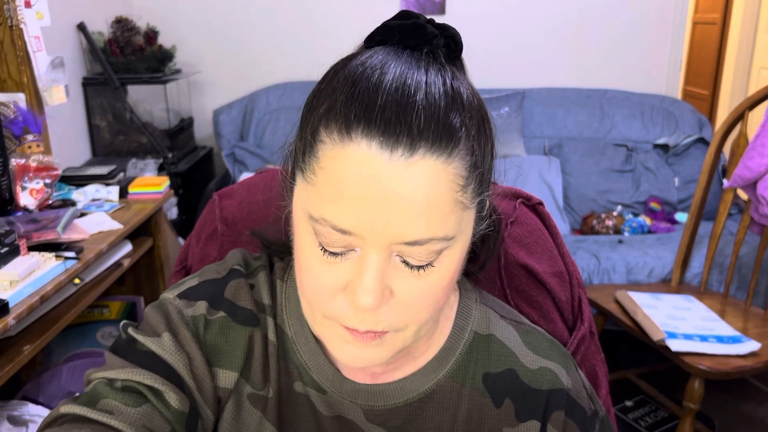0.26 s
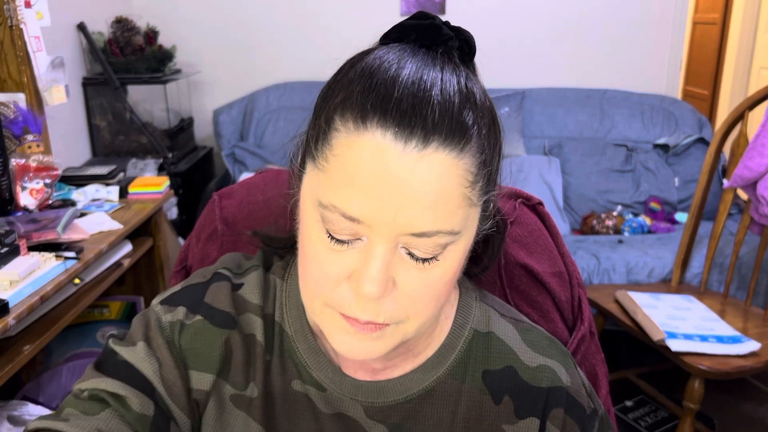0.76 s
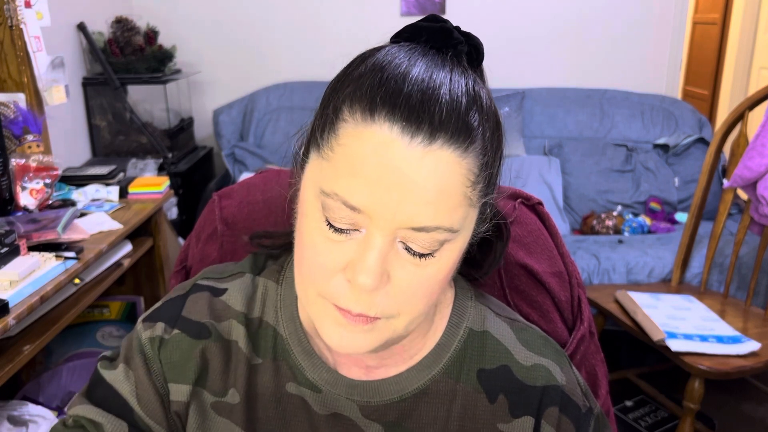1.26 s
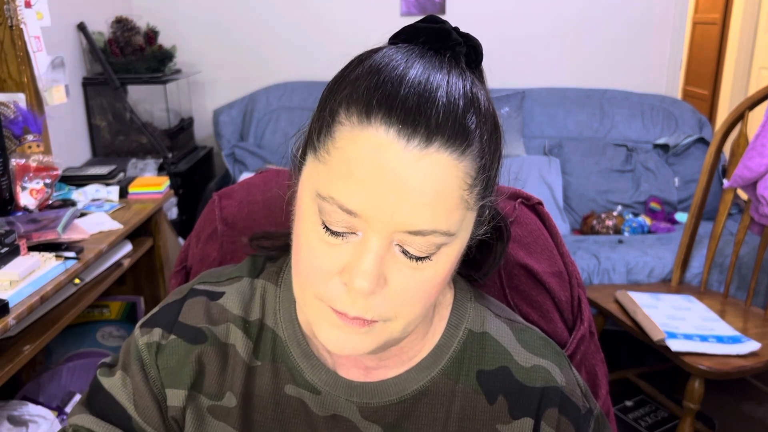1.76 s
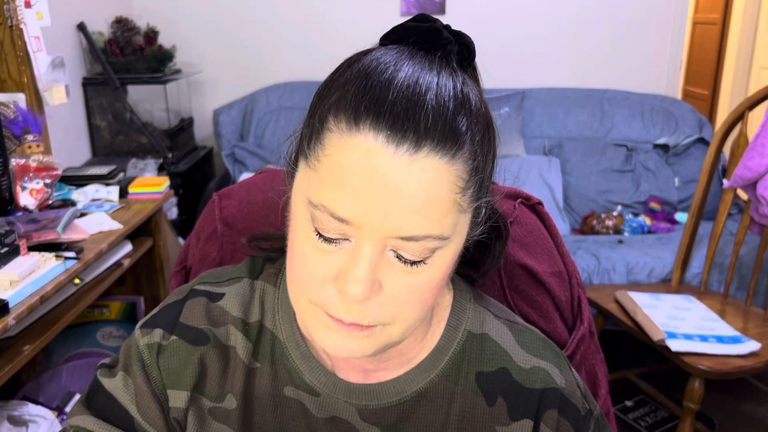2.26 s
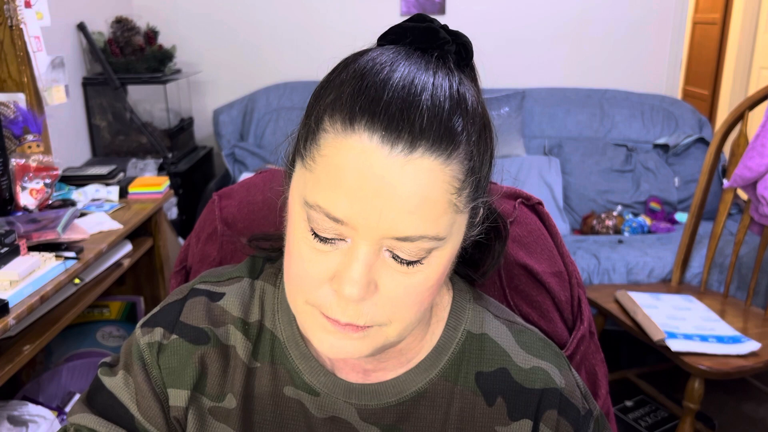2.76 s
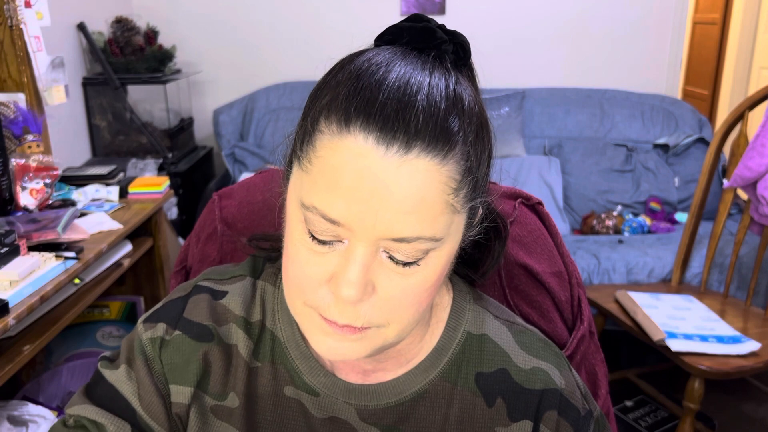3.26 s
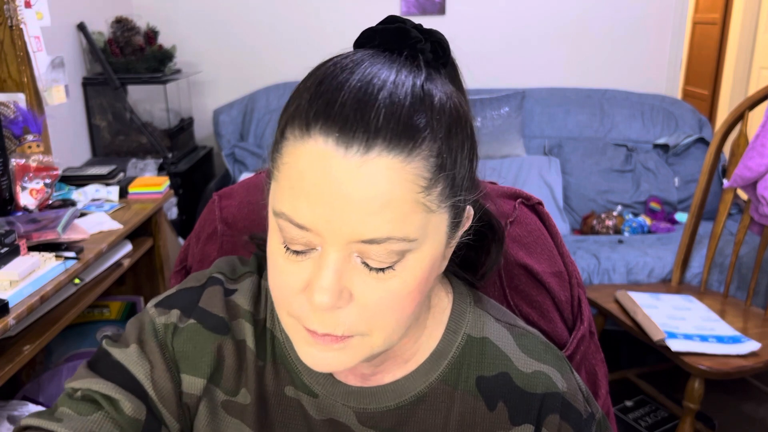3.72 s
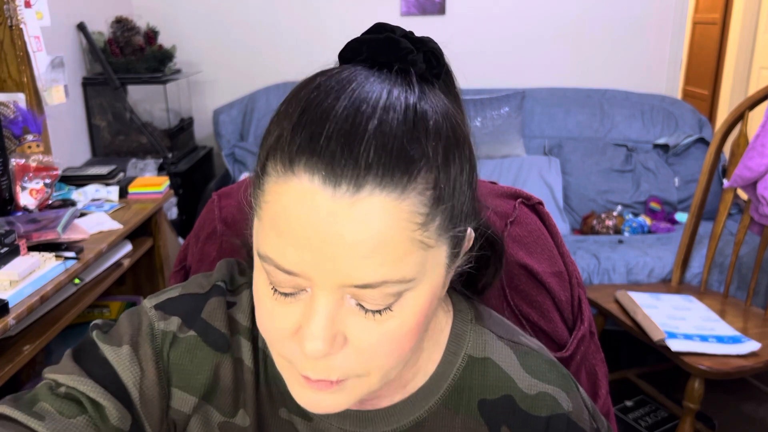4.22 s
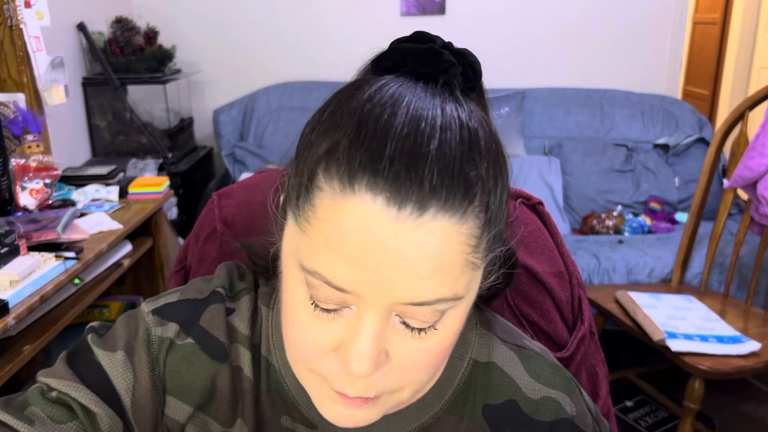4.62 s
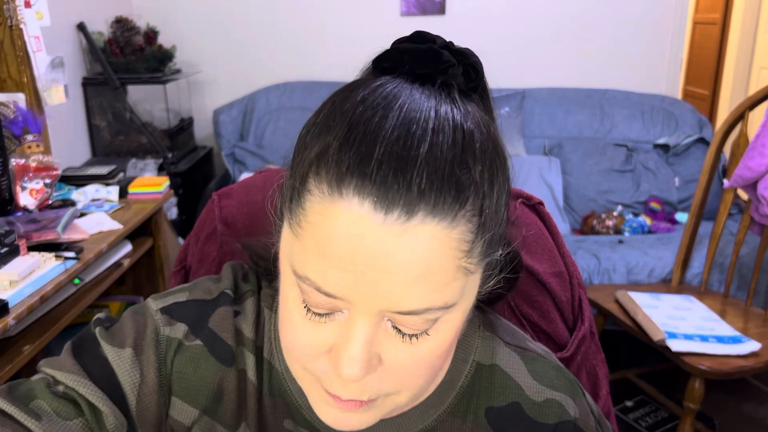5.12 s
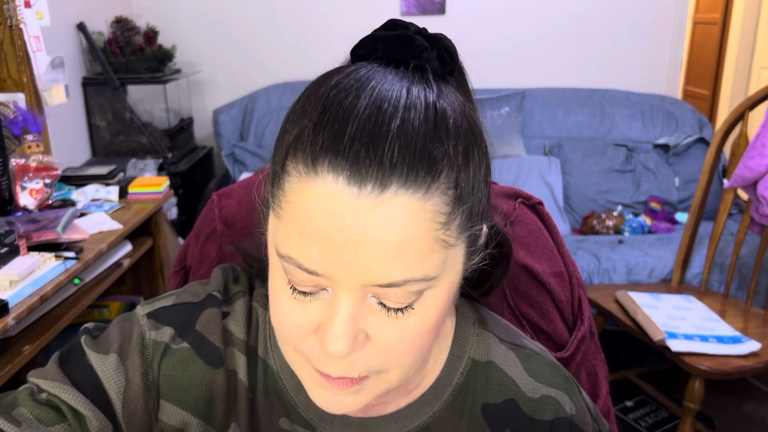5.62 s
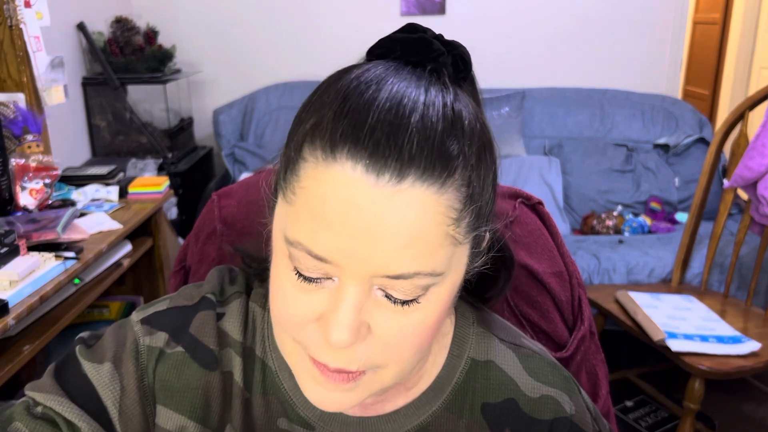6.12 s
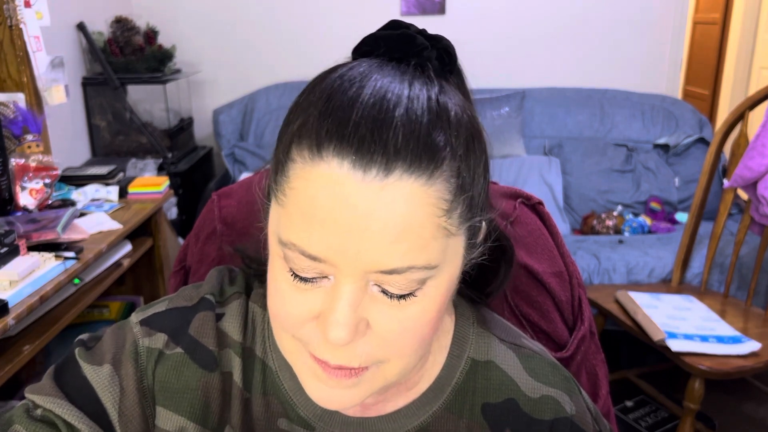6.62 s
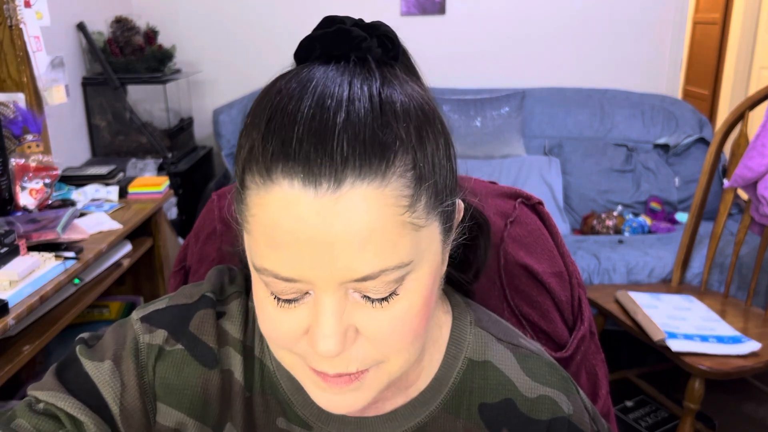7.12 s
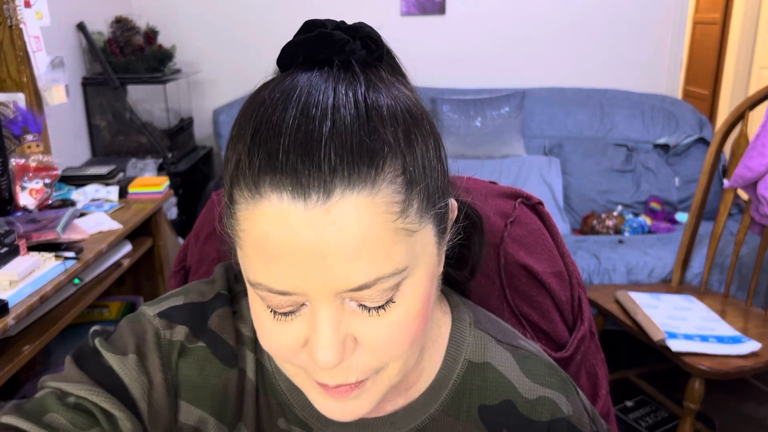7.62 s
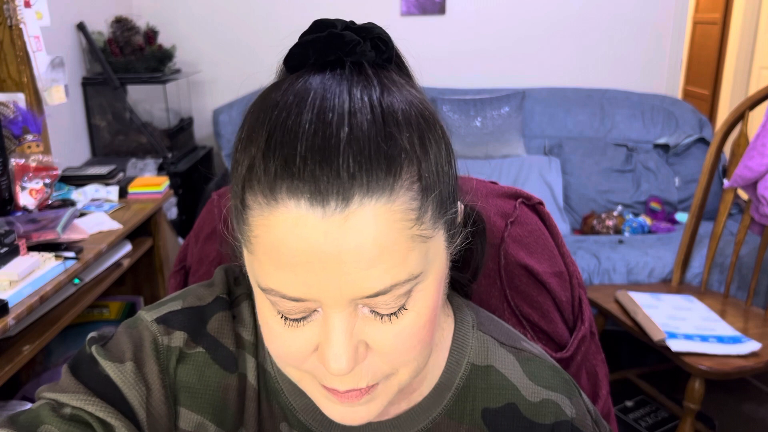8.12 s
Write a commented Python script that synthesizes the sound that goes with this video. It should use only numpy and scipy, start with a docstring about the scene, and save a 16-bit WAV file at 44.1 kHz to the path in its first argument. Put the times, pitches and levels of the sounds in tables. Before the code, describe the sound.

Hands rummage in a cardboard box, light cartons and plastic cases tapping, scuffing and clattering in bursts between quiet pauses, in a small furnished room.

```python
"""Cartons and plastic cases tap, scuff and clatter as hands rummage in a cardboard box in a furnished room.
Each knock is a burst of micro-slips that excites resonances of the item and the box; the heavier ones
also set off decaying low sines, the boom of the box. Fingers rubbing card and smooth wrapping swishing
past are coloured noise with tiny catches. Faint brushes, dull rumble, air noise and a low hum lie beneath."""
import sys
import numpy as np
from scipy import signal
from scipy.fft import rfft, irfft, next_fast_len
from scipy.io import wavfile

SR = 44100
rng = np.random.default_rng(int(sys.argv[2]) if len(sys.argv) > 2 else 0)


def transcribe(signal):
    """Save signal, clipped to [-1, 1], as a 16-bit WAV file at the path in sys.argv[1]."""
    frames = np.atleast_2d(signal).T
    limited = np.clip(frames, -1, 1)
    pcm = np.round(limited * 32767).astype(np.int16)
    wavfile.write(sys.argv[1], SR, pcm)


N = 369263
TIME = np.arange(N) / SR   # s


def from_db(db):
    """Decibels to gain."""
    return 10 ** (np.asarray(db) / 20)


def rms_one(x):
    """Scale to unit power."""
    return x / np.sqrt(np.mean(x ** 2) + 1e-20)


def energy_one(x):
    """Scale to unit energy."""
    return x / np.sqrt(np.sum(x ** 2) + 1e-20)


def at_hz(points, hz):
    """Read a table on a log-frequency axis."""
    table_hz, value = np.transpose(points)
    return np.interp(np.log(np.maximum(hz, 1)), np.log(table_hz), value)


def colour(x, spectrum):
    """Give a signal a spectral shape."""
    size = next_fast_len(x.shape[-1] + SR // 10)
    gain = from_db(at_hz(spectrum, np.fft.rfftfreq(size, 1 / SR)))
    return irfft(rfft(x, size) * gain, size)[..., :x.shape[-1]]


def butter(x, hz, kind, order=2):
    """Causal Butterworth filter."""
    hz = np.clip(hz, 10, SR / 2 - 500)
    return signal.sosfilt(signal.butter(order, hz, kind, fs=SR, output="sos"), x)


def resonance(x, hz, width_hz):
    """Two-pole resonance, gain 1 on top."""
    r = np.exp(-np.pi * width_hz / SR)
    feedback = [1, -2 * r * np.cos(2 * np.pi * hz / SR), r * r]
    return signal.lfilter(np.array([1, 0, -1]) * (1 - r * r) / 2, feedback, x)


def drift(rate):
    """Slow random wander of roughly unit spread, with `rate` new targets per second."""
    knots = rng.standard_normal(N // 20)
    return np.interp(TIME * rate, np.arange(len(knots)), knots)


def movements(rows, attack_s, release_s):
    """Gain over time of movements: each builds, holds and dies away; overlaps add in power."""
    power = np.zeros(N)
    for start_s, length_s, db in rows:
        span = slice(*np.searchsorted(TIME, [start_s, start_s + length_s + 10 * release_s]))
        age = TIME[span] - start_s
        build = np.minimum(age / attack_s, 1)
        die_away = np.exp(-np.maximum(age - length_s, 0) / release_s)
        power[span] += (from_db(db) * build * die_away) ** 2
    return np.sqrt(power)


def taps():
    """All the knocks of cartons and cases; the hardness of the contact sets its snap and crack."""
    # An item knocks or scuffs. Each row: time of the blow in seconds, clack level in dB, ring in Hz,
    # hardness in dB, snap pitch in Hz, swell in ms, settling in ms.
    tap_rows = [(0.135, -49, 904, -15.5, 1950, 7.4, 5.7), (0.257, -54, 940, -7.5, 2700, 2.3, 2.5),
                (0.368, -35.5, 613, -7, 2800, 1.3, 1.9), (0.4239, -55, 870, 5, 8760, 0.61, 2),
                (0.543, -50, 1250, -33, 2520, 25, 25), (0.613, -47.5, 1130, -35, 2400, 16, 14),
                (0.655, -49, 1220, -33, 2400, 19, 7.6), (0.831, -67.5, 1370, 2, 2780, 0.46, 4),
                (2.706, -86, 1570, 5.5, 3300, 0.9, 15), (3.7189, -47.5, 1060, -11, 1970, 0.37, 4.7),
                (3.765, -43, 1030, -9, 2120, 1.8, 7.7), (3.799, -49.5, 1400, -3.5, 2800, 4, 3.2),
                (4.008, -45, 1380, -10, 2940, 5, 5.3), (4.0703, -28.5, 847, -5, 2800, 0.13, 4.5),
                (4.119, -47.5, 1060, -16, 2000, 1.4, 2), (4.276, -47.5, 880, -12, 2200, .7, 1.5),
                (4.411, -42, 1270, -9, 2500, 0.23, 3.8), (4.46, -35, 1160, -3, 5450, 0.63, 1.3),
                (4.682, -49, 1020, -4.5, 3100, 0.22, 8.9), (4.9883, -31.5, 1060, -1.5, 9000, 0.3, 1.5),
                (5.053, -41, 830, -23, 2610, 1.5, 3.2), (5.068, -38, 1314, -6.5, 2720, 0.3, 5.6),
                (5.153, -52.5, 1004, -8.5, 2700, 0.8, 1.3), (5.164, -43, 870, -11.5, 2420, 2.5, 2.6),
                (5.336, -39.5, 970, -3, 2800, 0.51, 4.3), (5.354, -40.5, 795, -1.5, 3760, 24, 12),
                (5.371, -33, 1210, -2, 2900, 1.55, 0.66), (5.3817, -43.5, 1307, -0.5, 3260, 0.6, 1.8),
                (5.467, -38.5, 1160, 1.5, 2530, 6.6, 7.9), (5.5667, -38, 732, -4.5, 2530, 0.7, 5),
                (5.601, -31, 1010, -11, 3850, 2.4, 1.8), (5.6062, -39, 1092, 6, 3740, 0.82, 1.1),
                (5.612, -32, 1060, 1, 4400, 1.6, 1.8), (5.6226, -43, 1034, -4, 3260, 0.67, 2.2),
                (5.6576, -36.5, 1010, 3, 3450, 0.25, 2.9), (5.7368, -44, 980, -7.5, 2140, 0.57, 1.7),
                (5.769, -58.5, 404, -6, 2156, 1, 2.97), (6.795, -52.5, 1280, -2.5, 2930, 0.55, 3.2),
                (6.81, -51, 1320, -3, 2800, 0.72, 5.6), (6.851, -51, 1436, -1.5, 3500, 0.52, 3.5),
                (7.109, -45, 1490, 1, 3000, 0.24, 3.7), (7.164, -47.5, 1400, -3.5, 2270, 5, 6),
                (7.188, -48.5, 1400, -2.5, 2410, 4.6, 3.2), (7.224, -31.5, 506, -7, 2600, 1.1, 7.1),
                (7.251, -36, 530, -5, 2060, 0.35, 10), (7.274, -35.5, 532, -5.5, 2980, 5.2, 8.9),
                (7.295, -41, 432, -4, 2440, 0.7, 9.1), (7.314, -31, 865, -35, 2680, 2, 0.97),
                (7.351, -32, 647, -7, 2740, 7.1, 2.6), (7.391, -36.5, 600, -5, 2290, 3.8, 3.5),
                (7.622, -48.5, 1370, -7.5, 2830, 4.8, 5.6), (7.646, -32.5, 583, -4, 2680, 2.2, 4.3),
                (7.8447, -38.5, 990, 0.5, 2820, 0.72, 3.2), (8.148, -40.5, 770, -10.5, 2140, 11.5, 12)]
    out, lead = np.zeros(N + SR), SR // 30
    for s, db, ring_hz, hardness_db, snap_hz, swell_ms, settle_ms in tap_rows:
        # levels relative to the clack
        snap_db = hardness_db + 2.5
        crack_db = 0.5 + 1.7 * hardness_db   # harder edges crack more
        # light hollow cartons ring lower and shake the box less: 4.5 dB per octave
        thud_db = -14.5 + 4.5 * np.log2(ring_hz / 1000)
        knock = tap(ring_hz, thud_db, snap_db, snap_hz, crack_db, swell_ms, settle_ms, lead)
        start = max(round(s * SR) - lead, 0)
        out[start:start + len(knock)] += from_db(db) * knock
    return out[:N]


def tap(ring_hz, thud_db, snap_db, snap_hz, crack_db, swell_ms, settle_ms, lead):
    """One contact: micro-slips swell to a blow at sample `lead` and die away, shaking item and box."""
    # Resonances of cartons and cases, then of the box under them.
    # Each row: frequency in Hz, width in Hz, level in dB.
    clack_modes = [(420.3, 20, 3), (533, 34, 5), (644, 48, -8), (854, 71, 4.5), (1060, 26, -6.5),
                   (1350, 65, 2.5), (1420, 70, -2.5), (2023, 320, -7)]
    thud_modes = [(113, 5.8, 2.5), (150, 11, -1.5), (201, 120, -9), (350, 50, -10)]
    ms = (np.arange(SR // 5) - lead) * 1000 / SR
    pressure = np.exp(-np.abs(ms) / np.maximum(np.where(ms < 0, swell_ms, settle_ms), .05))
    slips = rng.standard_normal(len(ms)) * from_db(3.4 * rng.standard_normal(len(ms)))
    push = energy_one(slips * pressure) + 1e-18
    push[lead] += 1 / (1 + swell_ms)   # sudden contacts get a stronger clean blow

    # the item's size picks which of the shared modes speak, and adds a hollow ring of its own
    shared = body(push, clack_modes, uneven_db=2.0)
    shared = butter(shared, [ring_hz * 0.47, ring_hz * 3.54], "band")
    own_ring = resonance(push, ring_hz, ring_hz / 5)
    clack = energy_one(shared) + 1.2 * energy_one(own_ring)
    clack = energy_one(butter(clack, [270, 2800], "band"))

    # stiff edges snap in a broad band with one short ring
    edge = butter(push, [1800, 4600], "band")
    edge_ring = resonance(push, snap_hz, snap_hz / 5)
    snap = energy_one(edge) + 1.7 * energy_one(edge_ring)
    snap = energy_one(butter(snap, [snap_hz * .45, snap_hz * 2.26], "band"))

    thud = energy_one(butter(body(push, thud_modes), [110, 450], "band"))
    crack = energy_one(butter(butter(push, 5100, "high"), 13000, "low"))
    sound = clack + from_db(thud_db) * thud + from_db(snap_db) * snap + from_db(crack_db) * crack
    return sound * np.sqrt(SR / 100)   # clack at unit rms if spread over 10 ms


def body(push, modes, uneven_db=0):
    """Parallel resonances of alternating sign; each touch may weight them anew."""
    chance = rng.standard_normal(len(modes))
    out = 0
    for k, (hz, width_hz, db) in enumerate(modes):
        out = out + (-1) ** k * from_db(db + uneven_db * chance[k]) * resonance(push, hz, width_hz)
    return out


def hands():
    """Sliding hands: fingers rub card that flexes beneath them, and wrapping slides past."""
    # Fingers slide over card; then the hand staying in touch with the box between strokes.
    # Each row: start in seconds, length in seconds, rubbing in dB, box flexing in dB.
    stroke_rows = [(0, 0.026, -60, -65), (0.085, 0.11, -60, -58.5), (0.247, 0.13, -54, -61),
                   (0.345, .08, -42.5, -51.5), (0.469, 0.098, -53.5, -63), (0.583, 0.08, -58.5, -64),
                   (3.723, 0.095, -49.5, -60), (3.901, 0.084, -53, -60.5), (3.976, 0.058, -47, -58),
                   (4.071, .03, -44, -38), (4.1, .05, -48, -47.5), (4.15, 0.038, -48, -55),
                   (4.183, 0.074, -52.5, -57), (4.249, 0.029, -52, -46.5), (4.33, 0.12, -59, -70),
                   (4.42, 0.082, -48, -57), (4.558, 0.12, -54.5, -72.5), (4.684, 0.15, -49.5, -64.5),
                   (4.854, 0.043, -46, -58), (4.916, 0.093, -49, -57), (4.991, 0.0528, -42, -52.5),
                   (5.042, .04, -47.5, -53), (5.092, 0.092, -52.5, -59), (5.175, 0.065, -60, -61.5),
                   (5.232, 0.11, -50.5, -58), (5.33, 0.067, -41, -54), (5.46, 0.17, -43.5, -49.5),
                   (5.593, 0.031, -40, -41.5), (5.641, .04, -46, -47.5), (5.69, 0.12, -66, -55.5),
                   (6.795, 0.061, -56, -64), (7.108, .08, -49.5, -49.5), (7.218, 0.2, -47.5, -50),
                   (7.419, .035, -54.5, -64), (7.623, 0.095, -54, -65), (7.746, 0.059, -43.5, -57),
                   (7.792, 0.077, -46, -47), (7.872, 0.11, -53.5, -76), (7.98, 0.2, -62, -69),
                   (8.13, 0.086, -48, -58), (8.3, 0.038, -51, -56.5)]
    rest_rows = [(0, 0.56, -68.5, -74), (3.737, 2.01, -64, -68.5), (6.794, 0.62, -74.5, -78),
                 (7.48, 1, -71.5, -67)]
    # Wrapping is drawn past. Each row: start in seconds, length in seconds, swish in dB.
    swish_rows = [(.32, 0.084, -50), (.59, 0.07, -61.5), (.68, 0.083, -56), (3.76, 0.044, -55),
                  (3.91, 0.048, -54), (4.555, 0.085, -51), (4.84, 0.057, -51), (4.94, 0.096, -44.5),
                  (5.25, 0.14, -53), (5.46, .23, -50), (6.84, 0.078, -68.5), (6.97, 0.2, -65.5),
                  (7.68, 0.1, -59.5), (7.76, 0.086, -42), (7.92, 0.42, -51), (8.02, 0.19, -48.5)]
    contacts = stroke_rows + rest_rows
    rub_rows = [(s, length, db) for s, length, db, _ in contacts]
    flex_rows = [(s, length, db) for s, length, _, db in contacts]

    rubbing = movements(rub_rows, attack_s=0.0088, release_s=0.0087)
    # the box takes up the load and lets it go more slowly
    flexing = movements(flex_rows, attack_s=.016, release_s=0.023)
    drawn = movements(swish_rows, attack_s=0.033, release_s=0.022)
    swishing = np.hypot(drawn, from_db(-9.5) * rubbing)   # every stroke grazes some wrapping

    rubbed = from_db(-3.5) * rubbing * finger_rub()
    swished = from_db(-1.5) * swishing * wrapping_swish()
    return rubbed + swished + from_db(-4.0) * flexing * box_flex()


def finger_rub():
    """Friction of fingers on card, which makes panels sing and creases crinkle; steady unit power at first."""
    # Colour of the rubbing. Each row: frequency in Hz, level in dB per Hz.
    rub_spectrum = [(150, -24), (380, -4), (650, -5), (1020, -2.5), (1500, -7), (2200, -14), (3200, -13),
                    (6000, -31.5), (16000, -43.5)]
    # Panels that sing under a sliding finger. Each row: frequency in Hz, width in Hz, level in dB.
    panel_modes = [(602, 130, -4), (870, 190, -5), (1060, 65, -7), (1352, 700, -8.5), (1550, 170, -6.5),
                   (2300, 400, -1.5)]
    scrape = friction(rub_spectrum, catches_per_s=500, smooth=1.0, judder_db=3.0, judder_rate=90)
    panels = 0
    for hz, width_hz, db in panel_modes:
        # the moving finger favours now one panel, now another
        favour = from_db(db + 4.9 * drift(35))
        panels = panels + favour * rms_one(resonance(scrape, hz, width_hz))
    singing = rms_one(scrape + 1.5 * rms_one(panels))
    rub = rms_one(singing + .55 * crinkles(per_s=110, spread_db=4))
    return rms_one(butter(rub, 430, "high"))   # small panels radiate little bass


def crinkles(per_s, spread_db):
    """Small creases give way at random, each ringing for a few cycles at one of twelve pitches."""
    pitches = np.geomspace(850, 3400, num=12)   # Hz
    sizes = from_db(spread_db * np.minimum(rng.exponential(1, N), 2)) * rng.choice([-1, 1], N)
    clicks = sizes * (rng.random(N) < per_s / SR)
    dealt = rng.integers(0, len(pitches), N)
    out = 0
    for k, hz in enumerate(pitches):
        # higher creases are smaller and fainter
        out = out + resonance(clicks * (dealt == k) + 1e-18, hz, hz / 4) / hz
    return rms_one(out)


def wrapping_swish():
    """Friction of smooth wrapping, finer and brighter in grain than card."""
    # Colour of the swish. Each row: frequency in Hz, level in dB per Hz.
    swish_spectrum = [(500, -17), (1500, -11), (2800, -4), (4000, -4), (6000, -3), (8500, 0), (12000, -1.5),
                      (16000, -12.5)]
    return friction(swish_spectrum, catches_per_s=900, smooth=1.7, judder_db=3.0, judder_rate=110)


def box_flex():
    """Low, uneven friction noise of card bending under the hand."""
    # Colour of the flexing. Each row: frequency in Hz, level in dB per Hz.
    flex_spectrum = [(50, -31.5), (110, 1.5), (170, -1.5), (280, -5.5), (450, -7.5), (900, -17.5),
                     (3000, -62.5)]
    return friction(flex_spectrum, catches_per_s=110, smooth=0.62, judder_db=5.0, judder_rate=40)


def friction(spectrum, catches_per_s, smooth, judder_db, judder_rate):
    """Sliding surfaces: tiny catches over a smooth hiss, with uneven pressure."""
    sizes = from_db(2.7 * np.minimum(rng.exponential(1, N), 3)) * rng.choice([-1, 1], N)
    catches = rms_one(sizes * (rng.random(N) < catches_per_s / SR))
    pressure = from_db(judder_db * drift(judder_rate))
    force = (catches + smooth * rng.standard_normal(N)) * pressure
    return rms_one(colour(force, spectrum))


def booms():
    """The box bottom swings after the heavier knocks: decaying sines with a soft onset."""
    # Weight lands on the box. Each row: time in seconds, strength in dB.
    bump_rows = [(0.375, -54), (4.072, -26.5), (4.112, -45.5), (5.069, -40.5), (5.586, -35.5), (5.612, -31),
                 (7.821, -57)]
    # Deep modes of the box. Each row: frequency in Hz, level in dB, 60 dB decay time in seconds.
    boom_modes = [(60.3, -4.5, 0.36), (89.5, -14.5, 0.33), (125, -2, 0.13), (159.5, -2, 0.15)]
    pushes = np.zeros(N)
    for s, db in bump_rows:
        pushes[round(s * SR)] = from_db(db)
    t = TIME[:SR // 2]
    swing = sum(from_db(db - 60 * t / t60) * np.sin(2 * np.pi * hz * t) for hz, db, t60 in boom_modes)
    return signal.fftconvolve(pushes, swing * (1 - np.exp(-t / 0.016)))[:N]


def brushes():
    """Light, brief touches: bands of uneven noise that swell and trail off."""
    # Faint brushes in the pauses.
    # Each row: start in seconds, peak level in dB, centre in Hz, rise in seconds.
    brush_rows = [(1.82, -76.5, 1740, 0.047), (1.93, -81.5, 2750, 0.034), (2.15, -82, 5000, 0.038),
                  (2.689, -77, 3460, 0.035), (3.11, -78, 3730, 0.024), (5.93, -69.5, 2630, 0.025),
                  (5.99, -80.5, 2590, 0.067), (6.419, -65.5, 3180, 0.034)]
    grain = rng.standard_normal(N) * from_db(4.0 * drift(120))
    out = 0
    for s, db, hz, rise_s in brush_rows:
        age = np.maximum(TIME - s, 0) / rise_s
        stroke = (age * np.exp(1 - age)) ** 3
        out = out + from_db(db) * stroke * rms_one(butter(grain, [hz / 1.57, hz * 1.31], "band"))
    return out


def rumble():
    """Dull movement of the box: low noise that follows each shift."""
    # The box is shifted about. Each row: start in seconds, length in seconds, rumble in dB.
    shift_rows = [(0, .8, -69.5), (2.6, .18, -66), (3.76, .1, -56.5), (3.9, 1.9, -67), (6.21, .22, -50.5),
                  (6.45, .37, -65), (6.85, 1.5, -68), (7.94, .12, -67)]
    # Colour of the rumble. Each row: frequency in Hz, level in dB per Hz.
    shift_spectrum = [(15, -22), (35, -12.5), (52, 10.5), (75, -2.5), (120, -16), (300, -50), (1500, -79)]
    shifting = movements(shift_rows, attack_s=.06, release_s=0.047)
    return shifting * rms_one(colour(rng.standard_normal(N), shift_spectrum))


def room_tone():
    """Low ventilation noise as coloured noise, and mains hum as steady sines."""
    # Colour of the air noise. Each row: frequency in Hz, level in dB per Hz.
    air_spectrum = [(15, -22.5), (35, -12), (52, 1), (85, -10), (140, -14.5), (190, -19), (400, -22.5),
                    (1000, -28.5), (3000, -38), (8000, -42), (12500, -40.5), (16000, -66.5)]
    # Partials of the hum. Each row: frequency in Hz, rms level in dB.
    hum_partials = [(59.2, -74.5), (120, -73), (240, -88.5), (360, -100)]
    air = rms_one(colour(rng.standard_normal(N), air_spectrum))
    hum = 0
    for hz, db in hum_partials:
        hum = hum + from_db(db) * np.sqrt(2) * np.sin(2 * np.pi * (hz * TIME + rng.random()))
    return from_db(-72.0) * air + hum


def room(x, echo_s, echo_db, build_s):
    """One near reflection and a short diffuse tail, decaying at its own rate in each band."""
    # The room's decay. Each row: frequency in Hz, 60 dB decay time in seconds.
    decay_t60 = [(100, .45), (250, .42), (600, .3), (1500, .23), (4000, .17), (10000, .18), (16000, .15)]
    # How strongly the room answers. Each row: frequency in Hz, level in dB.
    send = [(60, -2.5), (200, -8.5), (600, -12.5), (1500, -10.5), (4000, -6.5), (10000, -16), (16000, -20)]
    t, edges = TIME[:SR // 2], np.geomspace(40, 20000, num=11)
    tail = 0
    for low, high in zip(edges, edges[1:]):
        hz = np.sqrt(low * high)
        band = butter(rng.standard_normal(len(t)), [low, high], "band")
        fade = from_db(-60 * t / at_hz(decay_t60, hz)) * (1 - np.exp(-t / build_s))
        share = np.sqrt(2 * (high - low) / SR)   # the band's part of the whole spectrum
        tail = tail + from_db(at_hz(send, hz)) * share * energy_one(band * fade)
    echo = from_db(echo_db) * np.interp(TIME - echo_s, TIME, x, left=0)
    return x + signal.fftconvolve(x, tail)[:N] + echo


def two_ports(x):
    """Stereo from close ports: they differ by a quarter-cycle part and diffuse scatter, mostly in the treble."""
    # Spread between the ports. Each row: frequency in Hz, side weight in dB.
    width = [(60, -17.5), (200, -9), (700, -8.5), (1300, -7.5), (2400, -5.5), (4400, -5), (8000, -2),
             (15000, -0.5)]
    t = TIME[:SR // 8]
    scatter = energy_one(rng.standard_normal(len(t)) * t * np.exp(-t / .009))
    quarter_cycle = np.imag(signal.hilbert(x, next_fast_len(N)))[:N]
    side = colour(.6 * quarter_cycle + .7 * signal.fftconvolve(x, scatter)[:N], width)
    return np.array([x + side, x - side])


def scene():
    """The rummaging in its room, over the boom and rumble of the box and the room tone."""
    handling = taps() + hands() + brushes()
    in_room = room(handling, echo_s=0.01, echo_db=-17, build_s=0.00033)
    return two_ports(in_room + booms() + rumble() + room_tone())


def record(dry):
    """The microphone has two dips in the high treble; the top is cut steeply at 16.1 kHz."""
    # Dips of the microphone. Each row: frequency in Hz, width in Hz, gain at the centre in dB.
    mic_dips = [(10450, 2200, -60), (14000, 1400, -27)]
    for hz, width_hz, db in mic_dips:
        dry = dry - (1 - from_db(db)) * resonance(dry, hz, width_hz)
    return signal.sosfilt(signal.ellip(10, .2, 80, 16100, fs=SR, output="sos"), dry)


dry = scene()
out = record(dry)
transcribe(out)
```